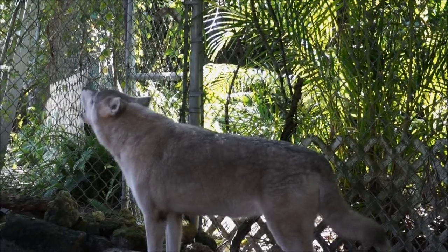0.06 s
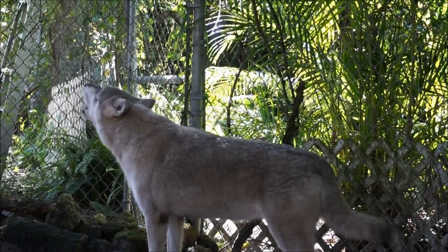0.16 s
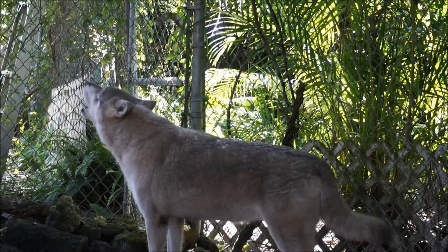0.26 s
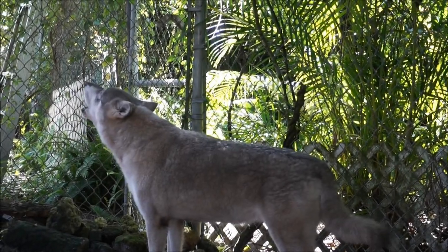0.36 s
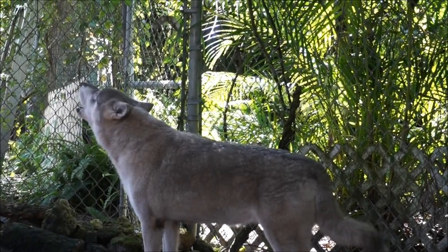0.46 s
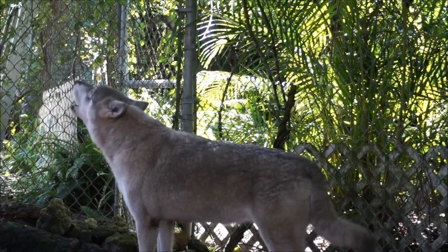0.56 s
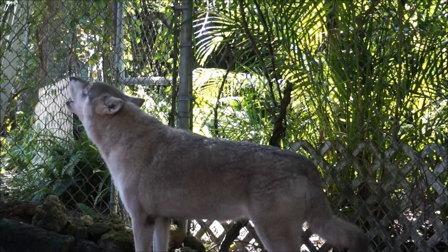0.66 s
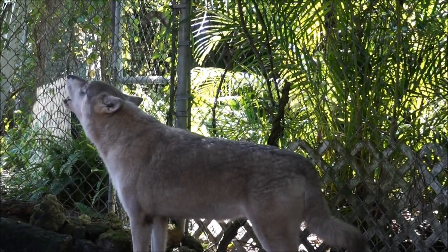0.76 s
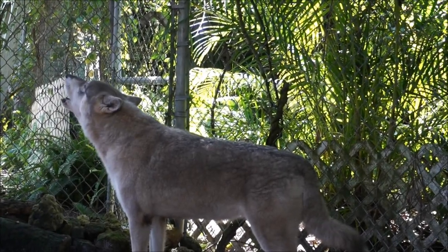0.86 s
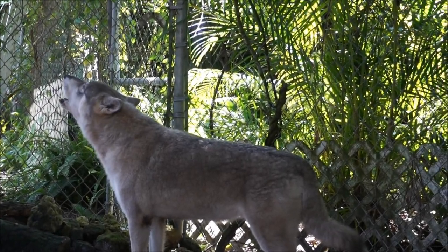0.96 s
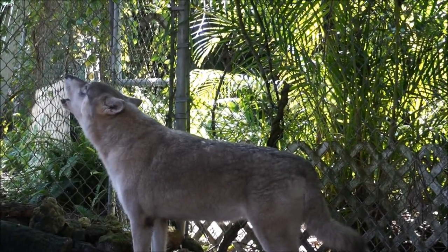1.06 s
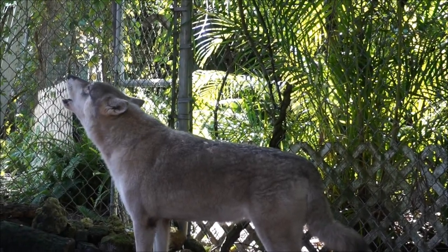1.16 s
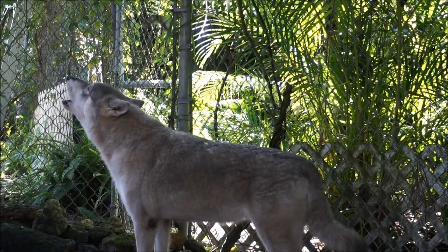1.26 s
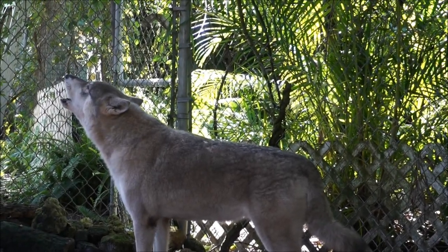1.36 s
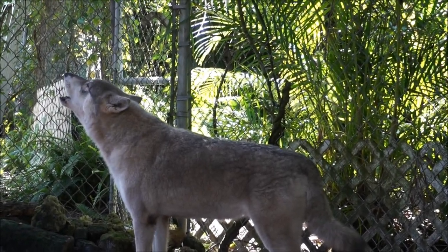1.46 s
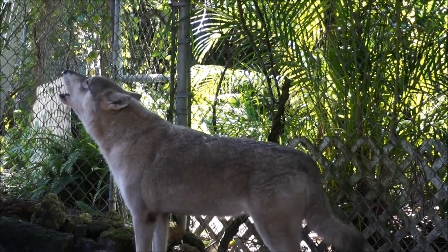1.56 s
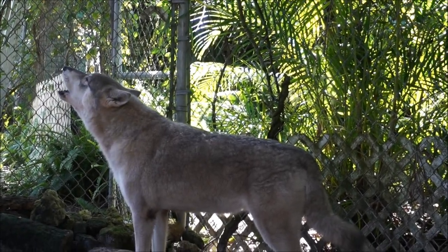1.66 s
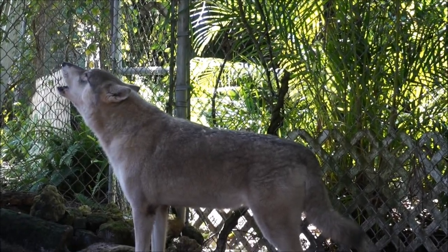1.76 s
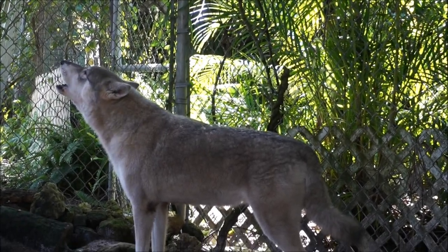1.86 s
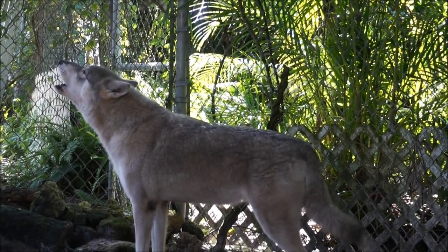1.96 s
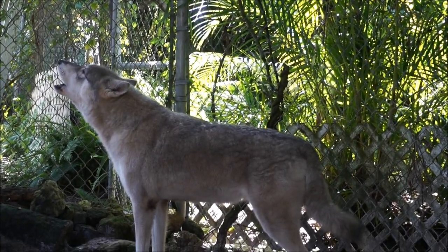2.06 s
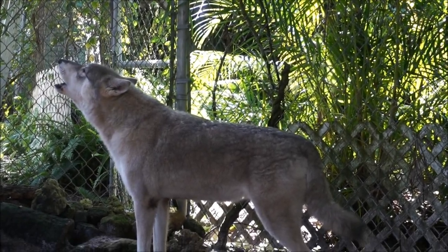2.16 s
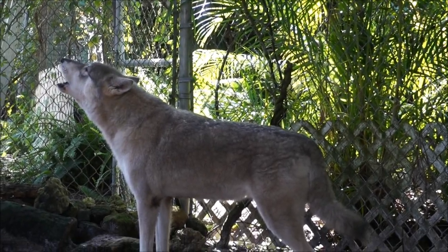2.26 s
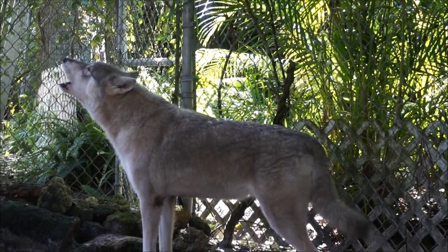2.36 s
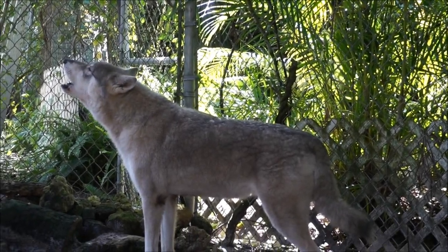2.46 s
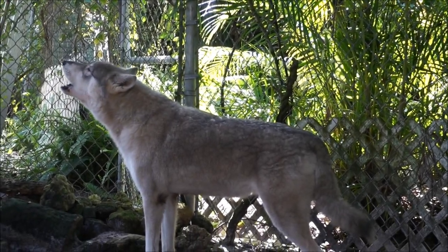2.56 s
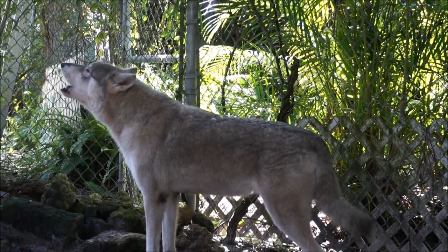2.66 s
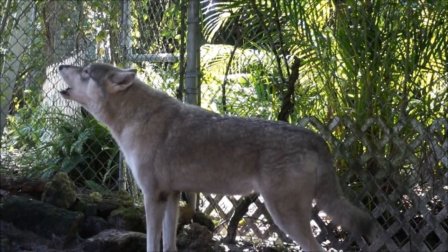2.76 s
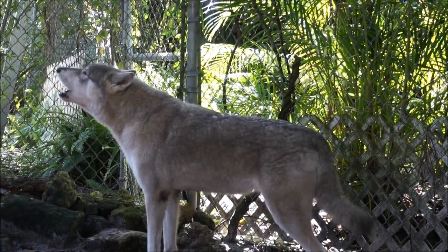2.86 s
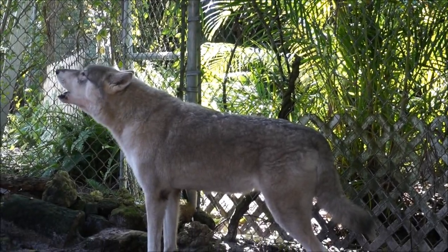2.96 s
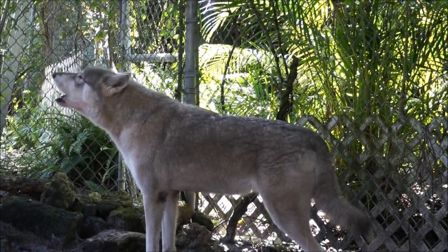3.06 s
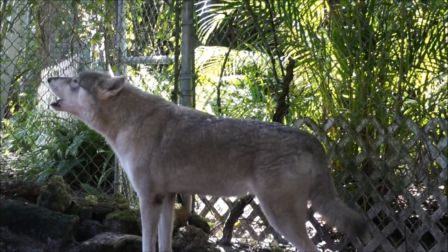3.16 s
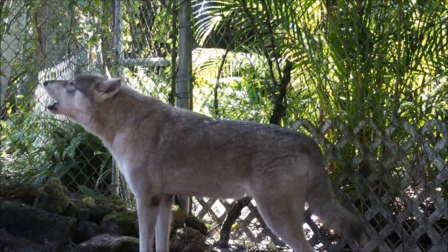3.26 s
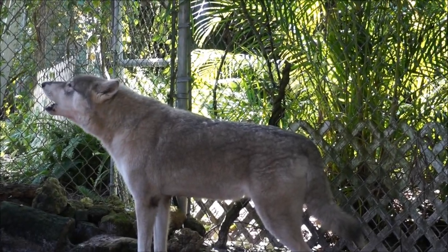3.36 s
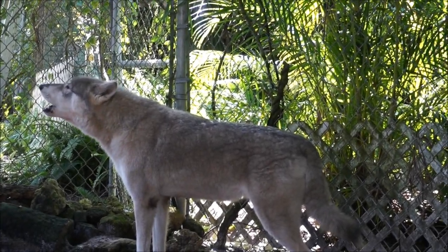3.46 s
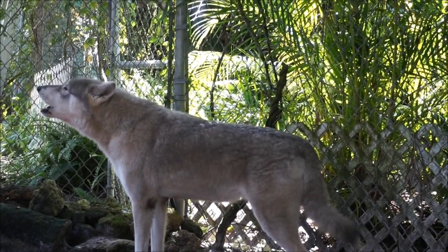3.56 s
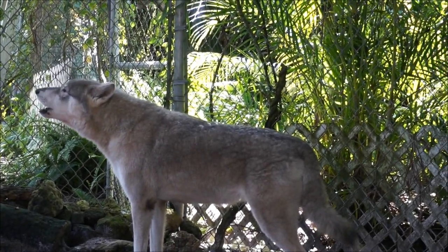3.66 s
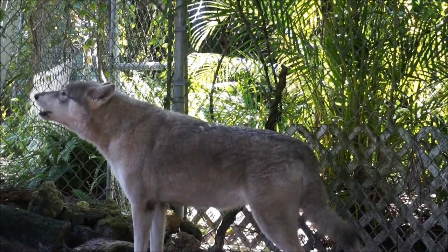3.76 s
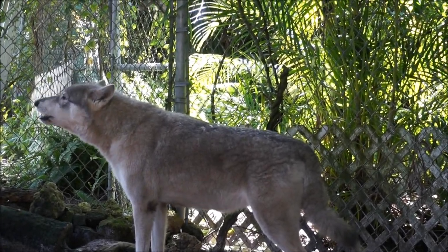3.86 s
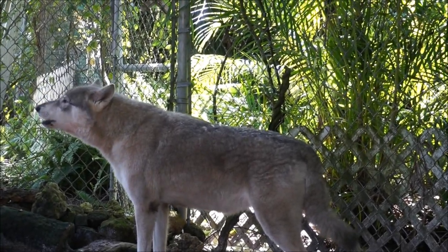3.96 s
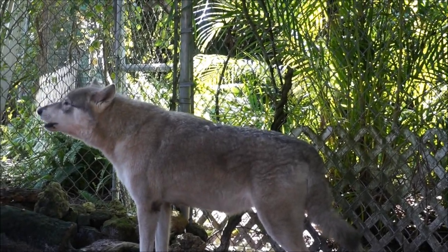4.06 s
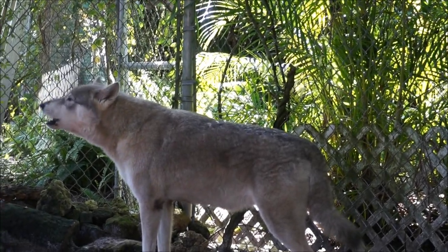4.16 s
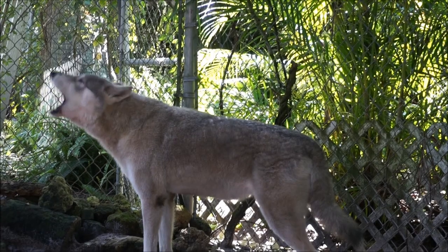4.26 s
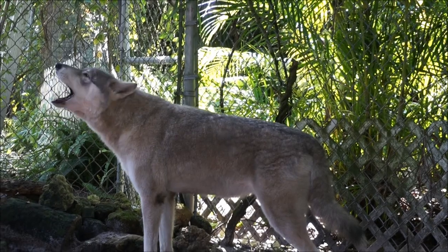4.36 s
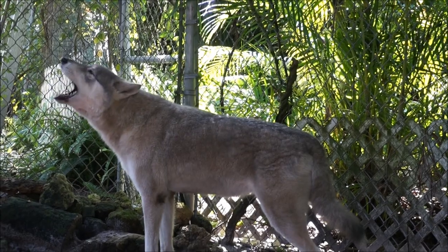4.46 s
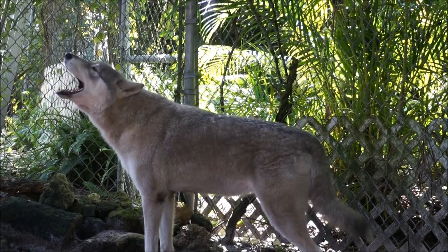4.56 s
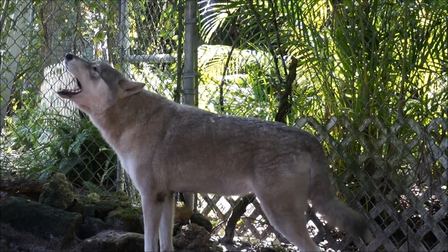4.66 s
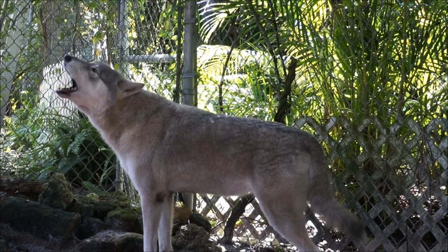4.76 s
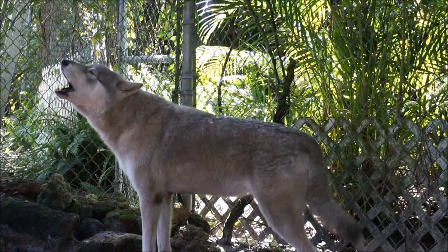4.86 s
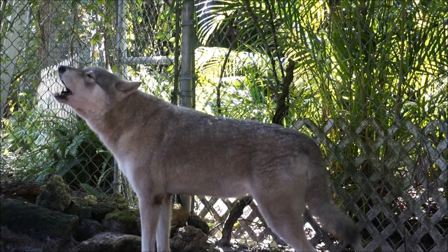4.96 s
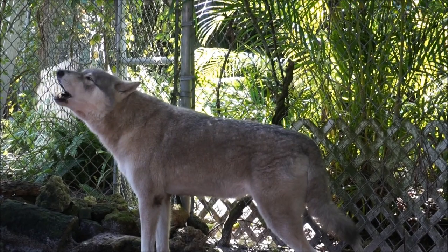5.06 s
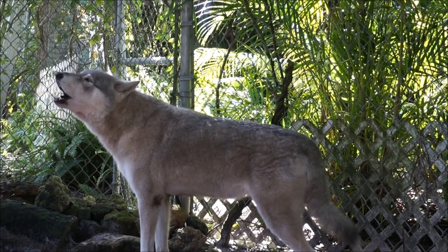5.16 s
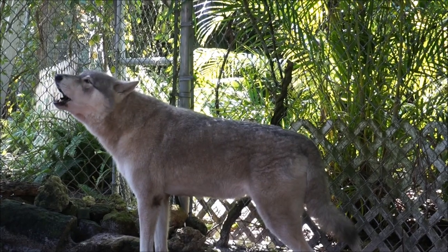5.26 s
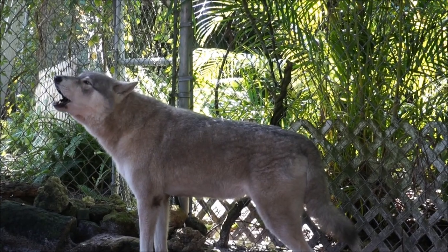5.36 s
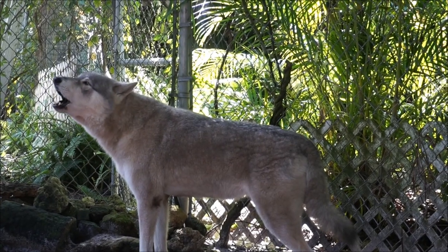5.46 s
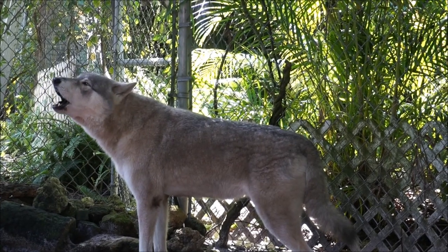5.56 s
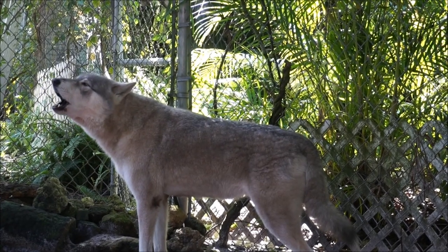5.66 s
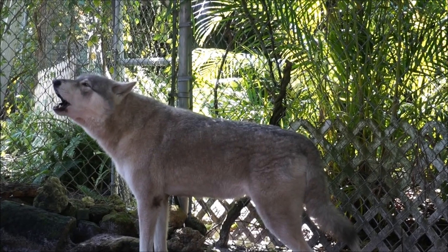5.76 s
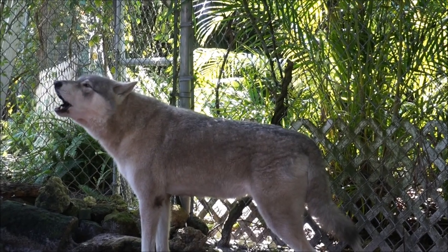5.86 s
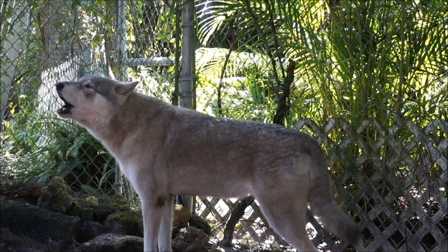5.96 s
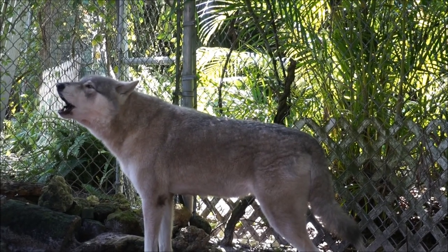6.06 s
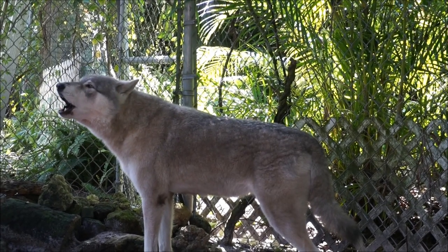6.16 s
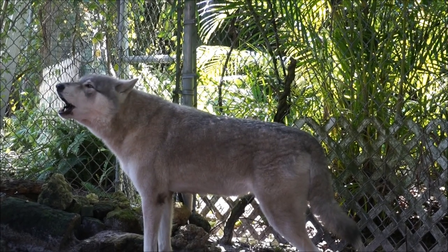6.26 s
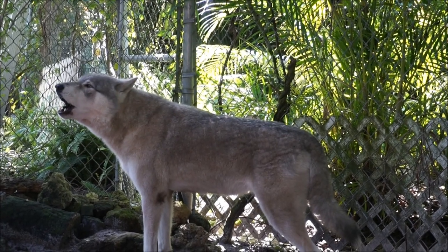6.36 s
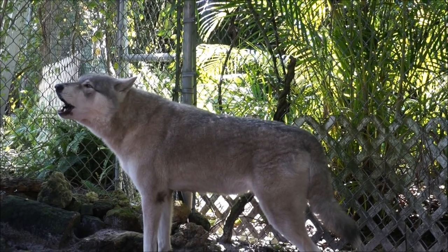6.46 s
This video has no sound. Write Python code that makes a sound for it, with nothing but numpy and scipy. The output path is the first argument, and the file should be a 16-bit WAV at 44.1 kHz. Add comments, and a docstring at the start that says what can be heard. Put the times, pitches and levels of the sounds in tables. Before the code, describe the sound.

A near wolf howls in a leafy outdoor enclosure, over low uneven noise and faint steady hiss. At 0 s it jumps up in a short, slightly raspy yelp, then settles into a smooth, mid-pitched howl sinking gradually. Faint birds chirp at about 0.3 and 0.5 s, then twitter in quick trills at 1.7, 2.2, 2.6 and 3.2 s. Near 1.8 s the howl steps abruptly lower into a purer tone, holds with a gentle rise around 3 s, and fades by 3.8 s. Distant wolves hold soft overlapping notes from about 1.1 s, exposed in the gap with four slurred, falling bird whistles. At 4.3 s the near wolf bursts into a louder yelp, cracks upward, dips and rises again, then drops by 4.7 s. It weakens into a rough, fluttering, half-pitch-tinged howl sinking slowly, growing breathier and still sounding at 6.5 s. More far wolves join around 5 and 6 s, with light leafy scatter.

```python
"""A near wolf howls twice in a leafy enclosure: harmonics of its vocal folds, plus rasp and hiss in puffs.
The first howl yelps, sinks and breaks into another register, while birds chirp and twitter as gliding
whistles and other wolves, a few harmonics each, hold notes further off. Slurred bird calls lead to the
second howl: a cracking yelp, then a sinking note that flutters and splits into a half pitch, over more
far notes. Scatter follows wolves and birds; low filtered noise and a steady faint hiss run throughout."""
import sys
import numpy as np
from scipy import signal
from scipy.fft import rfft, irfft, next_fast_len
from scipy.io import wavfile
from scipy.ndimage import uniform_filter1d, map_coordinates

SR = 44100
rng = np.random.default_rng(int(sys.argv[2]) if len(sys.argv) > 2 else 0)


def to_wav(s):
    """Save 16-bit WAV."""
    ch = np.atleast_2d(s).T  # columns
    pcm = np.round(np.clip(ch, -1, 1) * 32767)  # PCM
    wavfile.write(sys.argv[1], SR, pcm.astype(np.int16))


N = 287303

# the second yelp flips up in pitch between these times
CRACK_START_S, CRACK_END_S, CRACK_RATIO = 4.389, 4.453, 1.228
# resonances of the open register: f/Hz, level/dB
OPEN_REGISTER = [(288, -20), (312, -15), (365, -18.5), (500, -27), (565, 0), (750, 1.5), (855, -5),
                 (910, -16), (965, -4), (1110, -8), (1145, -25), (1250, -25), (1400, -13), (1520, -18),
                 (1700, -29.5), (2000, -25)]
# resonances of the low register: f/Hz, level/dB
LOW_REGISTER = [(418, 0), (436, -12.5), (462, 0), (494, -7.5), (535, 5), (745, -4), (780, -13), (835, -5),
                (980, -11.5), (1110, -5.5), (1160, -16.5), (1240, -16), (1330, -8), (1430, -16.5),
                (1490, -40.5), (1680, -24)]
# resonances of the upper register: f/Hz, level/dB
UPPER_REGISTER = [(320, -22.5), (590, -1.5), (680, 2.5), (935, -26.5), (975, -21.5), (1200, -21.5),
                  (1240, -10.5), (1268, -26.5), (1340, -31), (2500, -34)]


def amp(db):
    """Amplitude ratio of a level in dB."""
    return 10 ** (np.asarray(db) / 20)


def unit(x):
    """x scaled to rms 1."""
    return x / np.sqrt(np.mean(x ** 2) + 1e-20)


def along(points, hz):
    """Interpolate (f/Hz, value) points on a log frequency axis."""
    f, v = np.transpose(points)
    return np.interp(np.log(hz + 1), np.log(f + 1), v)


def curves(rows):
    """One value per sample for each column after the time."""
    s, *cols = np.transpose(rows)
    return [np.interp(np.arange(N) / SR, s, c) for c in cols]


def sounding(rows):
    """1 between the first and last row, with soft edges."""
    t = np.arange(N) / SR
    inside = (t >= rows[0][0]) & (t <= rows[-1][0])
    return uniform_filter1d(1.0 * inside, size=400)


def wobble(rate):
    """A smooth random curve, rate knots a second."""
    knots = rng.standard_normal(int(N * rate / SR) + 4)
    return map_coordinates(knots, [np.arange(N) * rate / SR])


def cycle(hz):
    """Running phase of a pitch curve."""
    return 2 * np.pi * np.cumsum(hz) / SR


def filtered(x, gain):
    """x times a gain that depends on frequency."""
    n = x.shape[-1]
    m = next_fast_len(n + 8192)
    return irfft(rfft(x, m) * gain(np.fft.rfftfreq(m, 1 / SR)), m)[..., :n]


def noise(spectrum, side_db, size=N):
    """Coloured stereo noise of rms 1."""
    white = rng.standard_normal((2, size))
    mid, side = filtered(white, lambda hz: amp(along(spectrum, hz)))
    side = amp(side_db) * side
    return unit(np.array([mid + side, mid - side]))


def first_howl():
    """Sung through pursed lips; its thin top harmonics fade as it goes on."""
    # t/s, pitch f/Hz, level/dB
    melody = [(0, 356.7, -19), (.058, 429.8, -9), (.068, 530, -18), (.11, 472.6, -15), (.2, 419.3, -18),
              (.55, 411.5, -18), (.68, 402.7, -13), (.95, 388.4, -12), (1.22, 377, -14.5),
              (1.45, 372.1, -13.5), (1.79, 363.9, -17.5), (1.84, 325.9, -13.5), (2.44, 323.1, -14),
              (2.6, 320.8, -12), (2.86, 327.3, -13.5), (2.96, 335.5, -14), (3.25, 331, -14.5),
              (3.46, 316.9, -16.5), (3.65, 308.9, -16.5), (3.73, 296.8, -27), (3.78, 270, -54)]
    # t/s, overtone level/dB, hiss level/dB; both before the offsets below
    treble = [(0, -40, -48), (.12, -23, -49.5), (.25, -45, -51), (0.701, -38.5, -51.5), (1.351, -34, -46.5),
              (1.74, -37.5, -47.5), (1.861, -49, -52), (2.85, -40.5, -50), (3.6, -43, -51),
              (3.78, -46, -58)]
    # overtone resonances, lips pursed: f/Hz, level/dB
    throat = [(1400, -11), (1650, 5), (1900, 4.5), (2080, 1), (2230, -35.5), (2450, -15.5), (2600, -11.5),
              (2750, -24.5), (2950, -19), (3300, -26)]
    # top harmonics: f/Hz, level/dB
    buzz = [(2900, -7), (3250, -18), (3900, 4.5), (4250, -11.5), (4650, 5.5), (5400, -7), (5900, -12),
            (7400, -17), (8500, 0), (11000, -8.5)]
    # hiss spectrum, lips pursed: f/Hz, relative level per Hz/dB
    mouth = [(3200, -30), (3900, -1), (4250, -15.5), (4650, 2.5), (5400, -2.5), (5900, -17.5), (7500, -14),
             (8400, -3), (10200, 4), (11700, -5), (14000, -2), (15500, -13.5)]
    return howl(melody, treble, throat, buzz, mouth, jaw=1.0, jitter=0.0011,
                overtone_db=-14, buzz_db=-10.5, buzz_fade_db_per_s=3.2,
                husk_db=-49, rasp_db=-0.5, harsh_db=-11.5, hiss_db=-1.0)


def second_howl():
    """Sung with jaws that open further, then slowly close."""
    # t/s, pitch f/Hz without the crack, level/dB
    melody = [(4.302, 290, -44), (4.322, 320, -21), (4.345, 446.6, -15), (4.375, 504, -10.5),
              (4.42, 517.5, -12), (4.448, 509.8, -12), (4.475, 440.4, -15), (4.515, 420.3, -12),
              (4.56, 474.5, -9), (4.605, 506.2, -9.5), (4.7, 424, -10), (4.725, 375.3, -16),
              (4.825, 380.6, -20.5), (4.86, 373.8, -19.5), (4.95, 364.3, -19.5), (5.05, 361, -24.5),
              (5.21, 327.5, -29), (5.4, 311.5, -24), (5.76, 308, -23.5), (5.97, 301.3, -19),
              (6.18, 294.3, -19.5), (6.4, 287.4, -20.5), (6.51, 285.2, -18.5)]
    # t/s, overtone level/dB, hiss level/dB; both before the offsets below
    treble = [(4.31, -59, -59), (4.45, -46, -51.5), (4.559, -26.5, -46), (4.78, -23.5, -46.5),
              (4.96, -38.5, -47.5), (5.3, -38, -46), (5.902, -34, -47), (6.351, -32.5, -42.5),
              (6.51, -28, -39)]
    # overtone resonances, mouth open: f/Hz, level/dB
    throat = [(1400, 5), (1650, -1), (1880, -0.5), (2230, -6.5), (2550, -16), (3000, -21.5), (3500, -32)]
    # hiss and top harmonics, mouth open: f/Hz, relative level/dB
    mouth = [(2900, -12), (4150, -11), (4700, -1), (5200, -8), (5700, 4), (6400, -9), (7200, -12),
             (8450, 2), (9200, -5), (11800, 1), (12900, -4), (14100, -1), (15700, -8)]
    # t/s, shift of the mouth resonances as a frequency ratio
    jaw_rows = [(4.3, 1.05), (4.6, 1.15), (4.9, 1.1), (5.2, 1.02), (5.5, 1.01), (6.5, .99)]
    return howl(melody, treble, throat, mouth, mouth, jaw=curves(jaw_rows)[0], jitter=.0012,
                overtone_db=-10.0, buzz_db=-16, buzz_fade_db_per_s=3.0,
                husk_db=-43, rasp_db=-6.0, harsh_db=-11.5, hiss_db=0)


def howl(rows, treble, throat, buzz, mouth, jaw, jitter, overtone_db, buzz_db, buzz_fade_db_per_s,
         husk_db, rasp_db, harsh_db, hiss_db):
    """Clean harmonics of the vocal folds, with rasp and hiss puffed out once a cycle."""
    # second vibration of the folds: t/s, rate as a share of the pitch
    flutter_rate = [(3.6, .385), (4.85, .225), (4.88, .232), (4.96, .28), (5.04, .32), (5.09, .5)]
    # rasp spectrum: f/Hz, relative level per Hz/dB
    rasp_spectrum = [(200, -31), (330, -22.5), (460, 8), (560, -7), (780, 4), (1050, -12.5), (1400, -11),
                     (2200, -36), (3500, -54.5)]
    # spectrum that joins a loud rasp: f/Hz, relative level per Hz/dB
    harsh_spectrum = [(600, -34), (1000, -1), (1450, -1), (1750, -12.5), (2100, -5), (2400, -16.5),
                      (2750, -23), (3600, -32), (8000, -37.5)]

    pitch, level = curves(rows)
    pitch = pitch * CRACK_RATIO ** (after(CRACK_START_S) - after(CRACK_END_S))
    upper, hiss = curves(treble)
    age_s = np.arange(N) / SR - rows[0][0]
    spell, depth = spells()
    rasp = 20 * np.log10(np.hypot(amp(husk_db), spell))

    # the rougher the voice, the less steady its folds
    rough = np.clip(amp(rasp - level), 0, 1)
    phase = cycle(pitch * (1 + jitter * wobble(70) + .04 * rough * wobble(300)))

    # a slower vibration swings their timing and strength, which adds sidebands
    depth = depth * amp(wobble(17))
    swing = np.cos(cycle(pitch * curves(flutter_rate)[0] * (1 + .025 * wobble(80))))
    swung = phase + depth * swing / np.pi
    flutter = 1 + .45 * depth * swing

    voice = np.zeros(N)
    for k in range(1, 5):
        gain = amp(level + 0.28 * k * wobble(18)) * register_gain(k * pitch)
        voice += np.sqrt(2) * gain * np.sin(k * swung + rng.uniform(0, 2 * np.pi))
    voice += amp(upper + overtone_db) * overtones(phase, pitch, throat, first=5, count=8, waver_db=0.0)

    # the jaws shift the resonances of the thin top harmonics and of the hiss
    top_gain = amp(hiss + buzz_db - buzz_fade_db_per_s * age_s)
    voice += top_gain * overtones(phase, pitch / jaw, buzz, first=9, count=32, waver_db=6.5)
    read_at = np.cumsum(jaw * np.ones(N))
    source = noise(mouth, side_db=3.5, size=N + 2 * SR)
    breath = np.array([map_coordinates(channel, [read_at]) for channel in source])

    # a loud rasp is also a brighter one
    harsh = amp(harsh_db + .5 * np.minimum(rasp + 30, 0)) * noise(harsh_spectrum, side_db=-8.0)
    turbulence = amp(rasp) * (amp(rasp_db) * noise(rasp_spectrum, side_db=-13) + harsh)
    turbulence = turbulence + amp(hiss + hiss_db + 1.8 * wobble(8.1)) * breath
    puffs = unit(1 + 0.39 * np.cos(phase))
    return sounding(rows) * flutter * (voice + puffs * turbulence)


def after(s):
    """0 before a register break at time s, 1 after it."""
    break_s = 0.0061  # time that a break takes
    return np.clip((np.arange(N) / SR - s) / break_s + .5, 0, 1)


def spells():
    """Rasp amplitude and flutter depth: each rough spell swells and dies away."""
    # t/s, swelling time/s, dying time/s, rasp level/dB, flutter depth [1]
    spell_rows = [(.015, 0.022, .07, -23.5, 0.08), (.12, .03, 0.28, -39, 0.1),
                  (2.275, 0.046, .075, -26, 0.18), (2.86, .04, .12, -34.5, 0.074),
                  (4.335, .022, .05, -14.5, 0.18), (4.458, .012, .04, -22, 0),
                  (4.551, .03, 0.026, -36, 0.0037), (4.68, .025, .04, -29, 0.08),
                  (4.857, .014, 0.15, -29.5, 1.42), (5.109, .04, 0.075, -33, 0.18),
                  (5.56, .07, .08, -31.5, 0.6), (5.73, 0.04, 1, -45, 0.48), (6.38, .055, .06, -24, 0.66),
                  (6.501, .03, .04, -28, 0.039)]
    t = np.arange(N) / SR
    rasp, flutter = np.zeros(N), np.zeros(N)
    for s, swelling_s, dying_s, db, depth in spell_rows:
        shape = np.exp(-((t - s) / np.where(t < s, swelling_s, dying_s)) ** 2)
        rasp += amp(db) * shape
        flutter += depth * shape
    return rasp, flutter


def register_gain(hz):
    """Gain of a low harmonic sliding through the resonances of the register of the moment."""
    # breaks of the voice: t/s, new register
    breaks = [(0, OPEN_REGISTER), (0.065, LOW_REGISTER), (1.798, UPPER_REGISTER), (4.0, OPEN_REGISTER),
              (CRACK_START_S, UPPER_REGISTER), (CRACK_END_S, OPEN_REGISTER)]
    gain = amp(along(breaks[0][1], hz))
    for s, register in breaks[1:]:
        gain = gain + after(s) * (amp(along(register, hz)) - gain)
    return gain


def overtones(phase, pitch, spectrum, first, count, waver_db):
    """Harmonics first to count sliding through fixed resonances, each wavering by itself."""
    total = np.zeros(N)
    for k in range(first, count + 1):
        gain = amp(along(spectrum, k * pitch) + waver_db * wobble(5))
        total += gain * np.sin(k * phase + rng.uniform(0, 2 * np.pi))
    return np.sqrt(2) * total


def near_stereo(wolf):
    """Places the near wolf by a level difference per frequency and a small lead on the left."""
    # f/Hz, left minus right level/dB
    pan = [(60, 2), (110, -3.5), (200, 4.5), (380, -1.5), (700, 2.5), (1290, 4.5), (2380, -4.5), (4400, 14),
           (8120, 2.5), (15000, 5.5)]
    lead_s = 3e-5

    def gain(hz):
        level = amp(np.outer([.5, -.5], along(pan, hz)))
        return level * np.exp(np.outer([1, -1], 1j * np.pi * hz * lead_s))
    return filtered(wolf, gain)


def far_pack():
    """Other wolves, in low and high notes with their own resonances."""
    # one table per howl: t/s, pitch f/Hz, level/dB
    low_notes = [
        [(1.8, 328, -52), (1.95, 323.1, -42.5), (2.5, 319.7, -45.5), (2.87, 311, -40), (3.4, 320.5, -36.5),
         (3.75, 323, -37.5), (4.2, 316.7, -33.5), (4.45, 311, -49.5), (4.8, 305, -50)],
        [(1.82, 405, -49), (1.93, 410.8, -34.5), (2.3, 392.3, -29.5), (2.4, 365, -34.5), (2.52, 330.1, -48)],
        [(3.82, 447, -60.5), (3.93, 440, -46), (4.04, 367.6, -46), (4.16, 391, -46), (4.3, 354, -44)],
        [(4.88, 508, -47), (4.96, 487, -36.5), (5.04, 479, -36.5), (5.12, 513.3, -32), (5.23, 538.5, -46)],
    ]
    # one table per howl: t/s, pitch f/Hz, level/dB
    high_notes = [
        [(1.1, 585, -57), (1.23, 591, -42), (1.45, 620, -45), (1.64, 615, -45), (1.8, 572, -41)],
        [(3.78, 517, -43), (3.92, 576, -50), (4.04, 598.4, -46), (4.16, 613, -44), (4.28, 628, -42.5),
         (4.47, 629, -37), (4.6, 624, -42), (4.7, 625, -67)],
        [(5.7, 548.6, -50), (5.98, 522, -45), (6.25, 513.7, -35), (6.51, 491, -39)],
    ]
    # resonances of the low notes: f/Hz, level/dB
    low_voice = [(300, -2.5), (520, 6), (630, -15), (960, -18), (1280, -23), (1600, -27), (1930, -13.5),
                 (2050, -42), (2700, -42.5)]
    # resonances of the high notes: f/Hz, level/dB
    high_voice = [(650, 0), (1000, -31.5), (1230, -3.5), (1450, -28.5), (1850, -24), (2500, -30),
                  (3600, -42)]
    low = sum(far_howl(rows, low_voice, waver=.003) for rows in low_notes)
    return low + sum(far_howl(rows, high_voice, waver=0.0028) for rows in high_notes)


def far_howl(rows, voice, waver):
    """A distant wolf: a few harmonics that fade in and out on their way."""
    pitch, db = curves(rows)
    phase = cycle(pitch * (1 + waver * wobble(25)))
    return sounding(rows) * amp(db) * overtones(phase, pitch, voice, first=1, count=6, waver_db=3.0)


def chirps():
    """Whistles that dive and climb again."""
    # t/s, level/dB relative to the other birds
    calls = [(.3, -50.5), (.54, -49.5)]
    # t from the start/s, nominal f/Hz, level/dB relative to the call
    shape = [(0, 4200, -8), (.015, 3450, 8), (.025, 2500, -25.5), (.045, 2550, 5), (.065, 3050, 7.5),
             (.075, 3400, -2)]
    return bird(calls, shape)


def twitters():
    """A whistle that swings up and down at an uneven rate, loudest in its middle."""
    # t/s, level/dB relative to the other birds
    calls = [(1.675, -49), (2.16, -51.5), (2.62, -53.5), (3.165, -49)]
    trill_hz, swing_hz, trills_per_s = 3205, 480, 23
    length_s, edge_fade_db = 0.16, 3.5
    song = np.zeros(N)
    for s, db in calls:
        age_s = np.arange(N) / SR - s
        hz = trill_hz - swing_hz * np.cos(2 * np.pi * trills_per_s * age_s + 1.1 * wobble(70))
        arch_db = -edge_fade_db * (2 * age_s / length_s - 1) ** 2
        gain = sounding([(s,), (s + length_s,)]) * amp(db + arch_db + 2.5 * wobble(80))
        song += gain * np.sqrt(2) * np.sin(cycle(hz))
    return song


def slurs():
    """Whistles that jump about at the start, then slide down."""
    # t/s, level/dB relative to the other birds
    calls = [(3.82, -52), (3.965, -52.5), (4.11, -49.5), (4.245, -48.5)]
    # t from the start/s, nominal f/Hz, level/dB relative to the call
    shape = [(0, 3220, 2), (.012, 3720, 4.5), (0.022, 2750, 8), (0.025, 3286, 4), (0.051, 3120, 4.5),
             (.08, 2916, 8), (.095, 2640, -2)]
    return bird(calls, shape)


def bird(calls, shape):
    """One whistled figure, repeated with small changes of pitch."""
    song = np.zeros(N)
    for s, db in calls:
        rows = np.array(shape) + [s, 0, db]
        hz, level = curves(rows)
        tone = np.sin(cycle(hz * (1 + rng.normal(0, 0.025))))
        song += np.sqrt(2) * sounding(rows) * amp(level) * tone
    return song


def leaf_scatter(wolf):
    """Leaves throw back mostly treble."""
    # f/Hz, level/dB
    scatter = [(300, -23.5), (700, -19), (1200, -12), (2500, 1), (6000, -2)]
    return filtered(wolf.mean(axis=0), lambda hz: amp(along(scatter, hz)))


def yard(x):
    """Scatter from fences and foliage: decaying noise, different at each ear."""
    # f/Hz, t60/s
    decay = [(200, 0.27), (2000, 0.49), (10000, 0.14)]
    hz, t, z = signal.stft(rng.standard_normal((2, SR // 2)), SR, nperseg=256)
    fade = amp(-60 * t / along(decay, hz)[:, None])
    tail = signal.istft(z * fade, SR, nperseg=256)[1]
    delayed = np.pad(x, (400, 0))[None]
    return signal.fftconvolve(delayed, tail / np.linalg.norm(tail[0]), axes=1)[:, :N]


def background_noise():
    """Low noise with a set level curve, under a steady faint hiss."""
    # spectrum: f/Hz, relative level per Hz/dB
    spectrum = [(25, -26), (60, -17), (120, -14.5), (190, -7.5), (250, 1), (400, -4), (700, -15),
                (1200, -23.5), (2500, -28.5), (3800, -29), (4500, -33), (15000, -39.5)]
    # gain of the low noise: t/s, level/dB
    noise_level = [(0, -46), (.15, -54), (.8, -44.5), (1.6, -42), (2.05, -49.5), (3.4, -50), (4.25, -42.5),
                   (4.45, -56), (5.55, -51.5), (5.85, -47), (6.5, -47)]
    hiss_gain_db, split_hz = -47.5, 1500
    whole = noise(spectrum, side_db=-19)
    low = filtered(whole, lambda hz: 1 / (1 + (hz / split_hz) ** 4))
    low_gain = amp(curves(noise_level)[0] + 2.7 * wobble(9.7))
    return low_gain * low + amp(hiss_gain_db) * (whole - low)


def scene():
    """Near wolf, pack, birds, their scatter and the background noise."""
    # a muzzle radiates no bass
    wolf = filtered(first_howl() + second_howl(), lambda hz: 1 - 1 / (1 + (hz / 190) ** 5))
    pack = far_pack()
    birds = chirps() + twitters() + slurs()
    echoes = yard(leaf_scatter(wolf) + amp(-9.5) * pack + amp(-10.5) * birds)
    return near_stereo(wolf) + pack + amp(-6.5) * birds + echoes + background_noise()


def record(dry):
    """Removes everything from the band limit up."""
    top_hz = 15700
    return filtered(dry, lambda hz: hz < top_hz)


dry = scene()
out = record(dry)
to_wav(out)
```